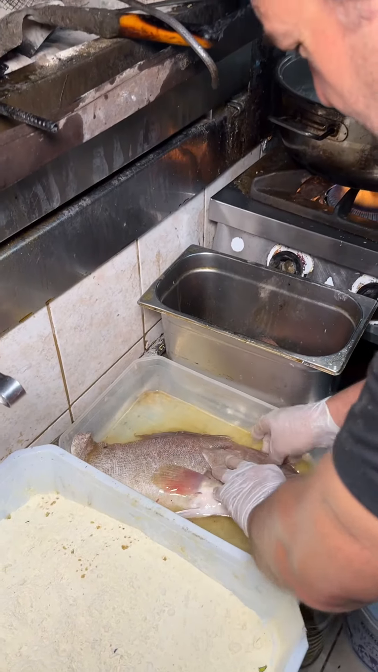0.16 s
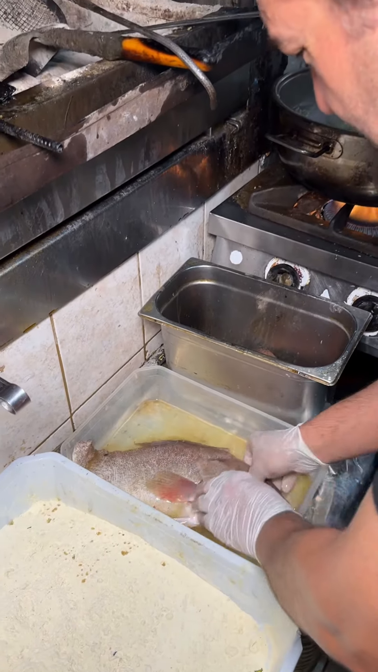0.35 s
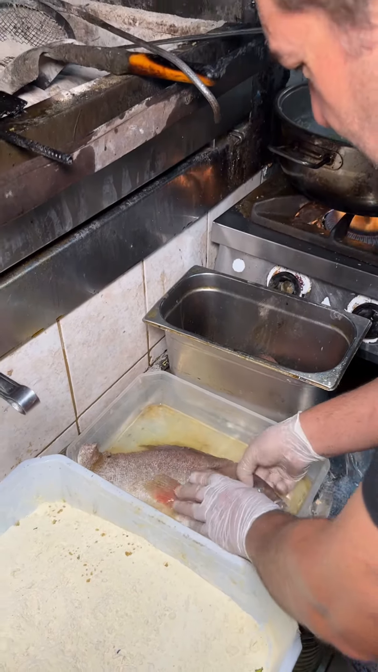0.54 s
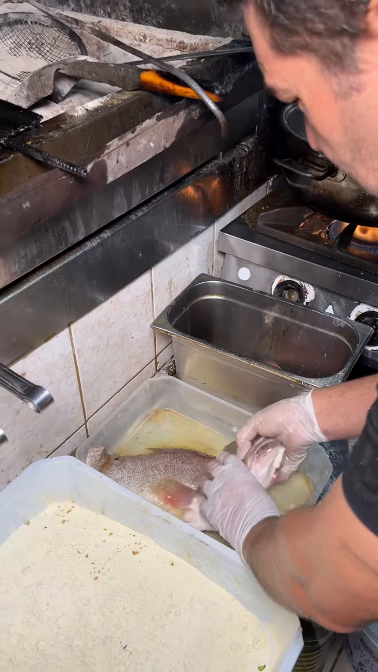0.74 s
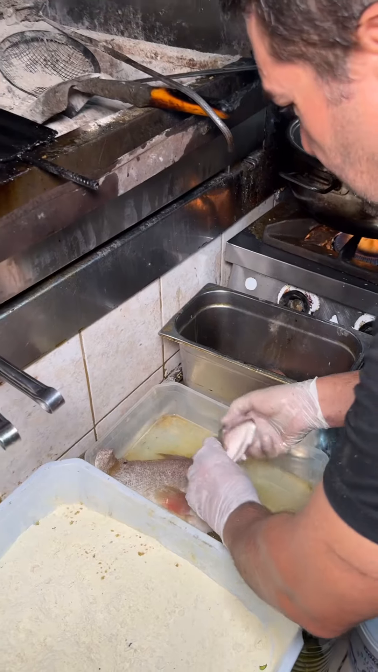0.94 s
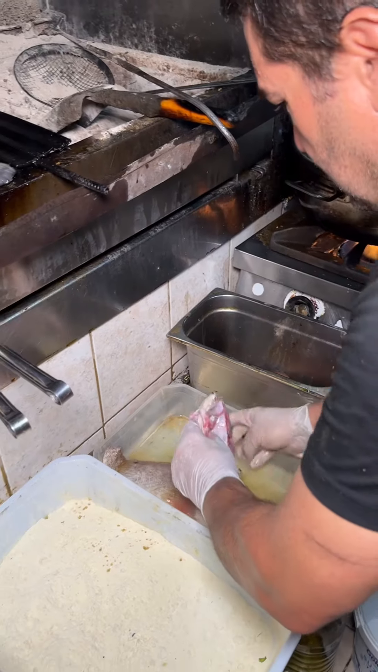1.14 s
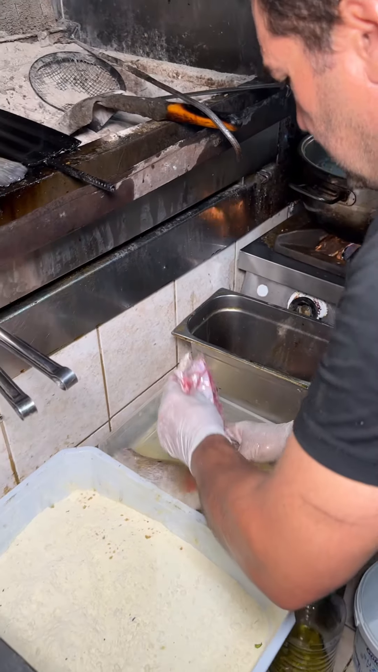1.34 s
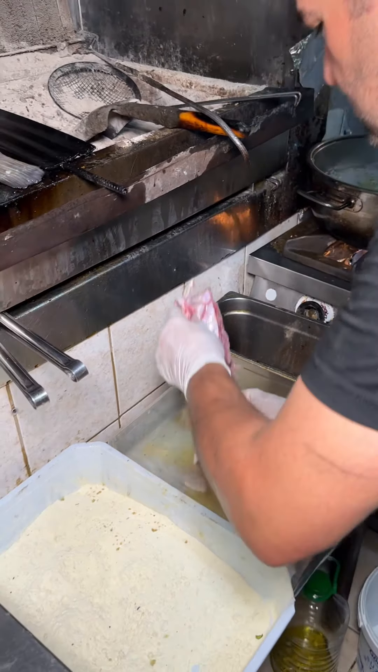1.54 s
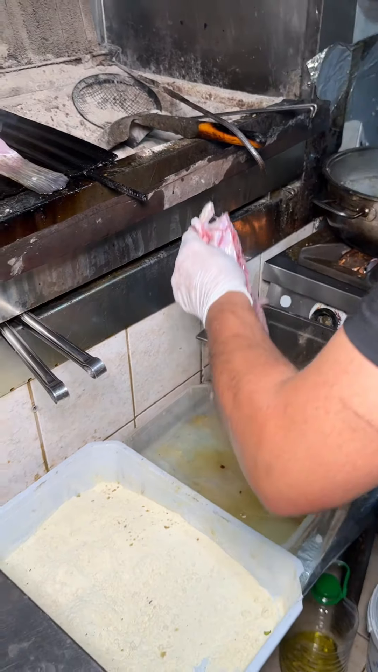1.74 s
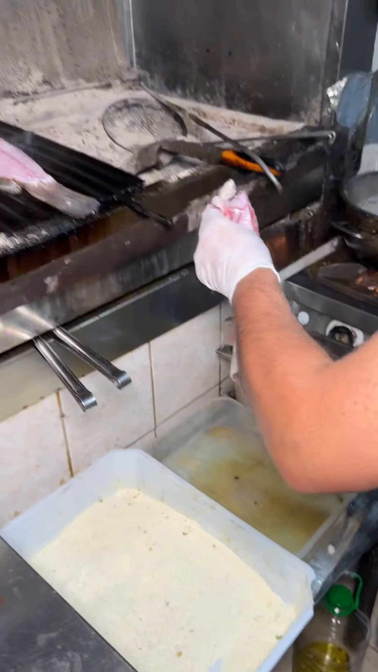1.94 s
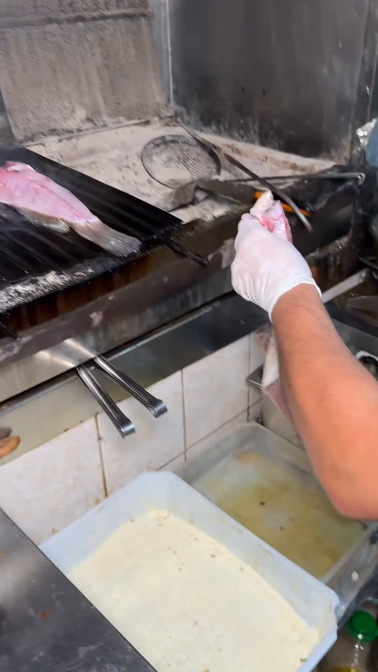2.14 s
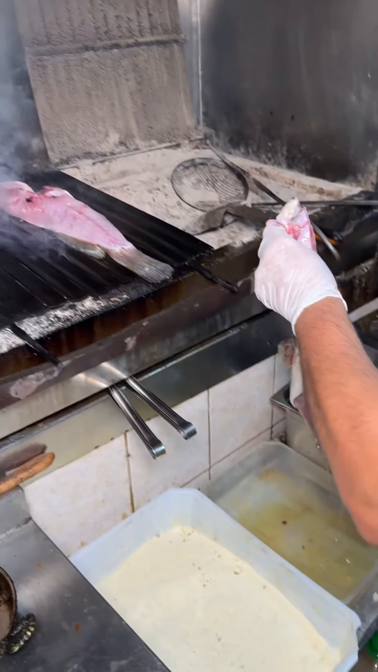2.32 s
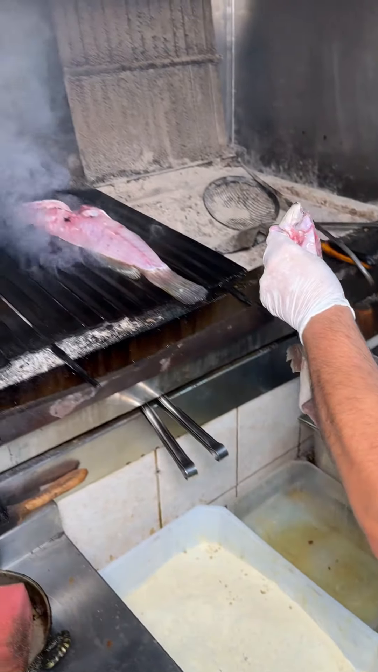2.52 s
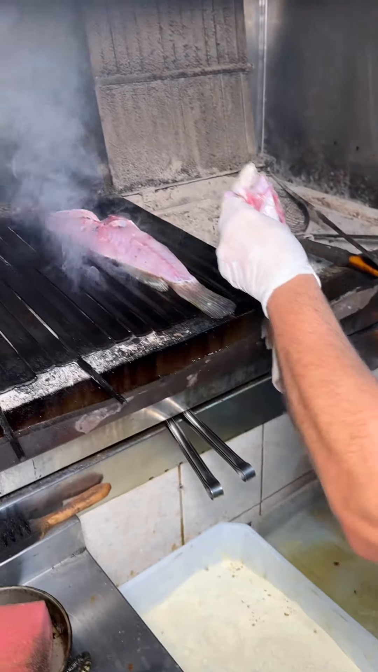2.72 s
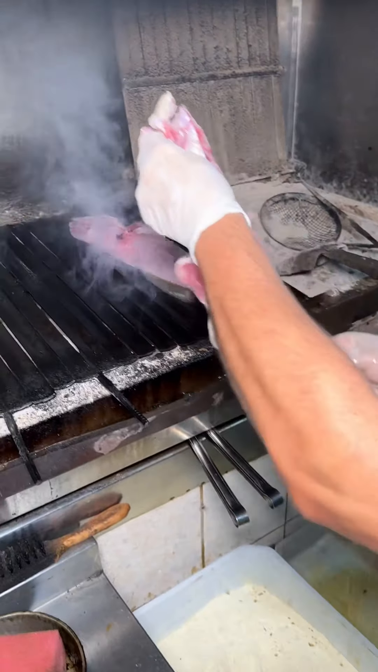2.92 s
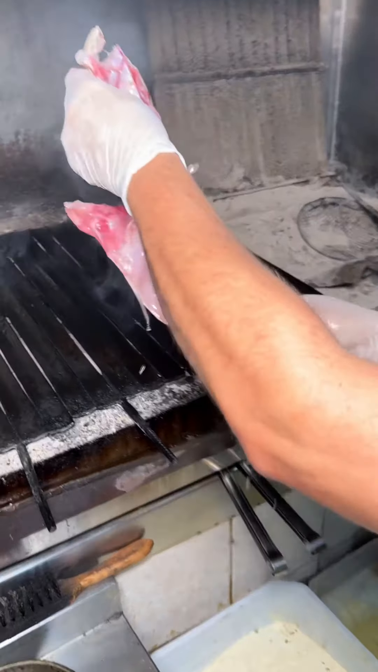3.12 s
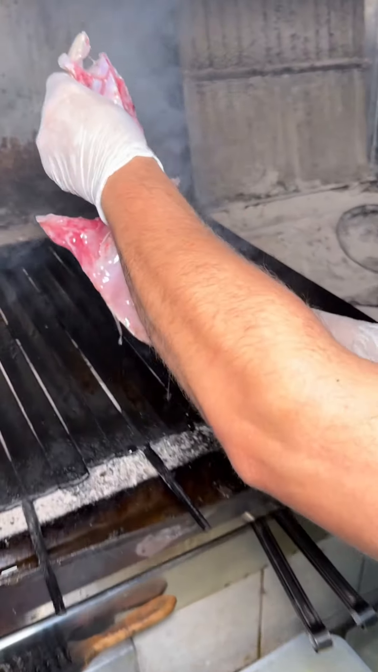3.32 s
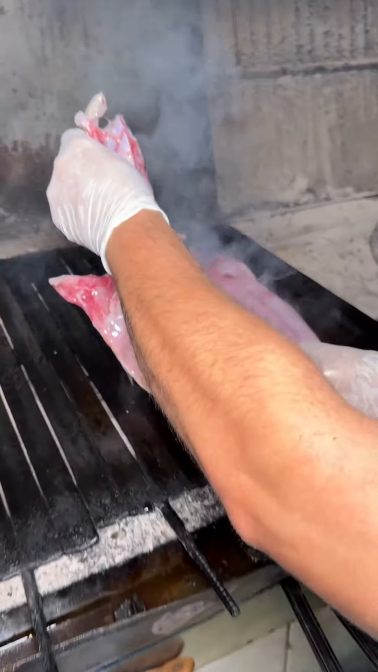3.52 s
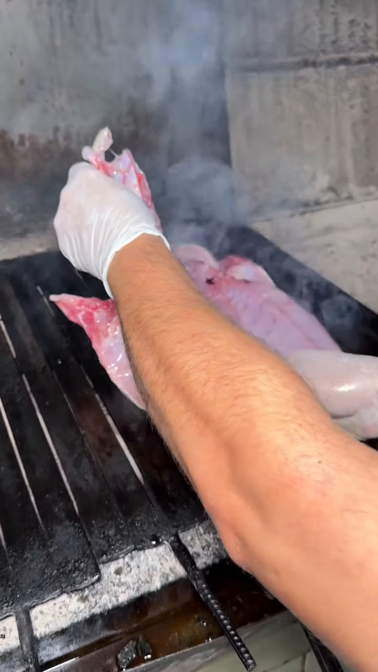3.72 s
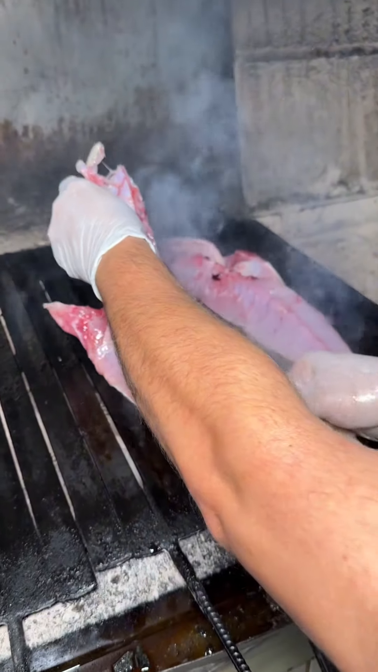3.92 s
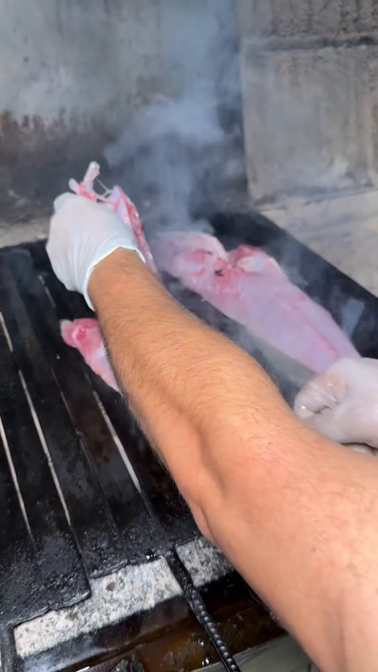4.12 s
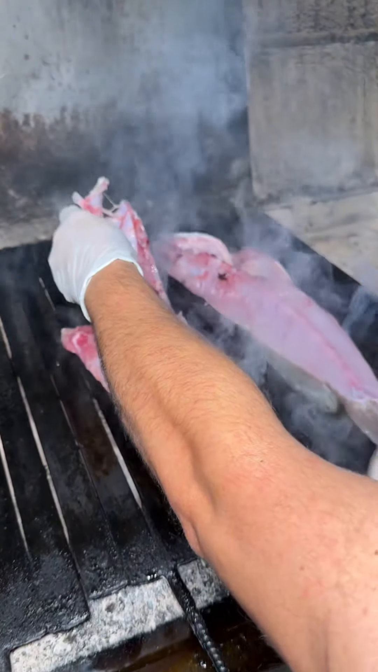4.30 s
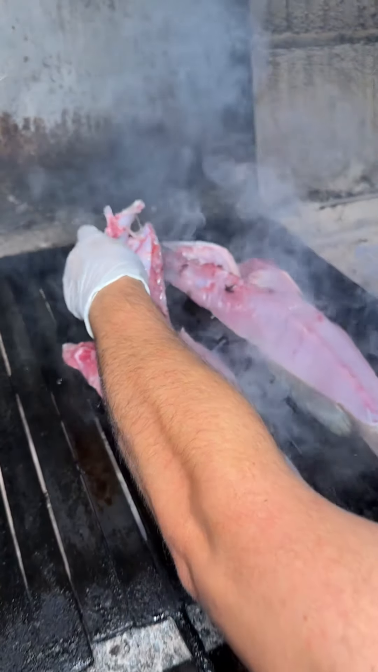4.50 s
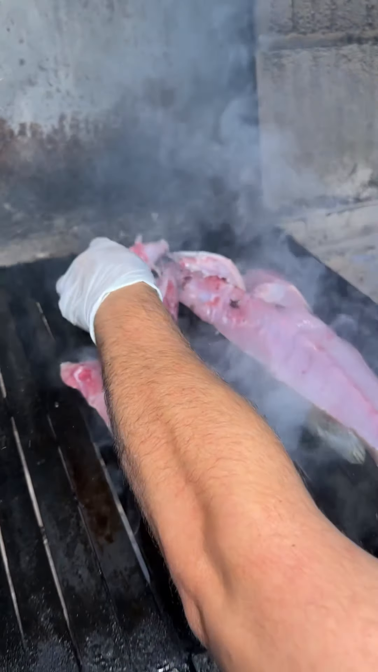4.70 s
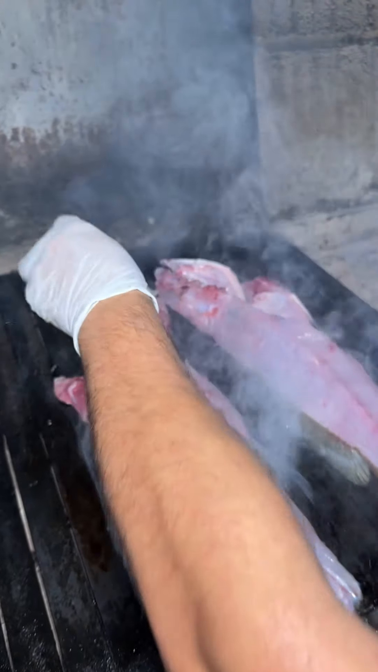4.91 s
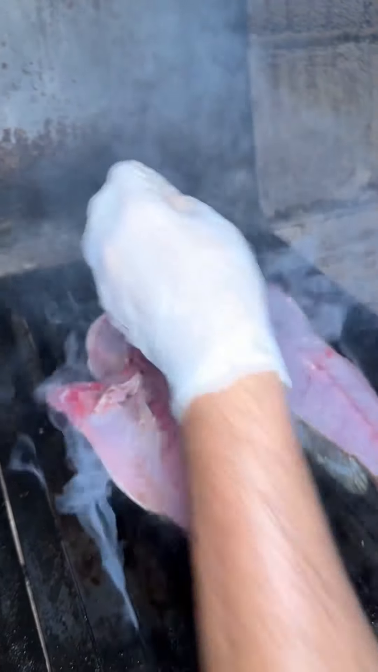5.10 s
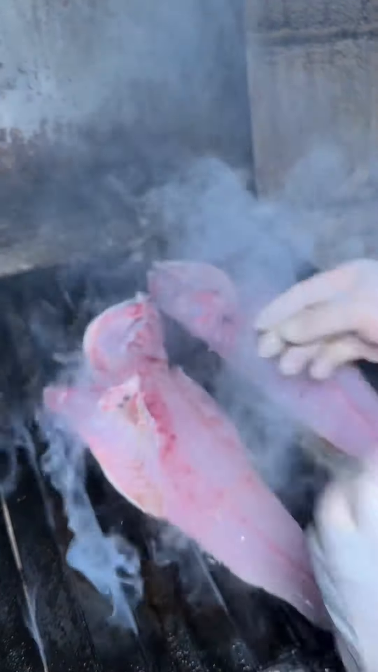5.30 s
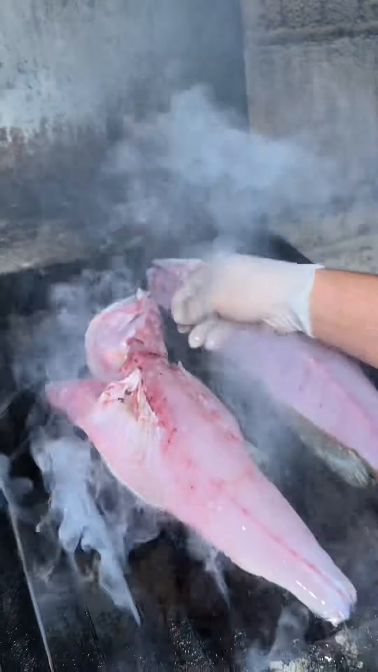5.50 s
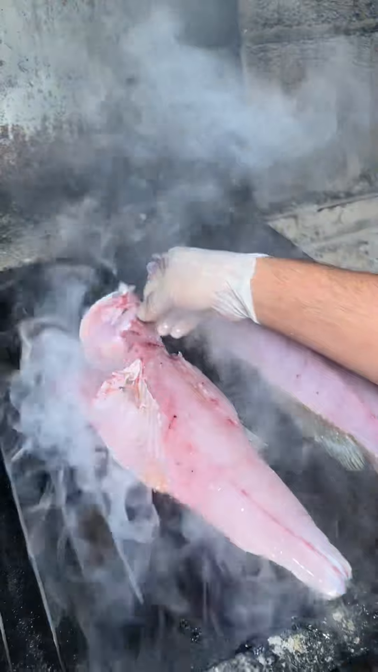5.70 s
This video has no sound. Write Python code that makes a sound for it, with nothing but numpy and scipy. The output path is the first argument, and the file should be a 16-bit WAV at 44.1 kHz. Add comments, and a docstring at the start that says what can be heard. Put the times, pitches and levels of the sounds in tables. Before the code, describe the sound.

Handheld close stereo pickup beside a hot grill. Thin distant crackling and droplet spits sit over a wavering low motor hum and drawn air. Soft boxy bumps are followed by a bright metallic clack. Then wet fish touches the bars and a dense, bright sizzle rises within about half a second, covering most of the background, with soft smacks, sharp pops and a brief steam squeak at the end.

```python
"""Kitchen with a charcoal grill: extractor and coolers hum (wavering sines) in a draught (shaped noise).
A first fish sizzles a little way off: random bursts, coloured and fluttering. Spits, flares and squeaks
are snaps, spray and narrow noise; dull thuds and clacks are rough tones, ringing modes and noise.
From 3.3 s a second, wet fish is laid on the bars close by: slaps, a swelling hiss and boiling juice.
Two closely spaced microphone ports pick it up."""
import sys
import numpy as np
from scipy import signal
from scipy.fft import rfft, irfft
from scipy.io import wavfile
from scipy.ndimage import uniform_filter1d

SR = 44100
rng = np.random.default_rng(int(sys.argv[2]) if len(sys.argv) > 2 else 0)


def pcm_store(signal):
    """Save signal as 16-bit PCM."""
    levels = np.round(np.clip(np.atleast_2d(signal), -1, 1) * 32767)
    wavfile.write(sys.argv[1], SR, levels.astype(np.int16).T)


N = 253575
TIME, HZ = np.arange(N) / SR, np.fft.rfftfreq(N, 1 / SR)

# sizzle spectrum from afar: freq_hz, density_db
FAR_FRY = [(300, -40), (1000, -20), (1700, -12), (2400, -6), (3100, -8), (4500, -4), (6200, 0),
           (7500, -1.2), (9500, -3), (11500, -1), (15000, 0)]
FIRST_FISH_DB = -34  # rms

# motor tones, the first one also scaled by the approach: freq_hz, level_db_rms, waver_rad_rms
HUM = [(46.7, -38, 0.12), (100.4, -39.5, 0.54), (137.8, -53.5, 1.4), (224.4, -45.5, 2.08), (238, -48, 1.73),
       (388.6, -54.5, 0.6)]
# drawn-air spectrum: freq_hz, density_db
DRAUGHT = [(20, -20), (45, -13), (70, 1.5), (120, -4.5), (190, 0.5), (250, -5), (310, -8), (420, -9.5),
           (750, -12), (1100, -19), (2000, -22), (5000, -19)]
DRAUGHT_DB, HUM_WAVER_HZ = -38.5, 8.1
# the deepest tone grows as the microphone moves in under the hood
APPROACH_S, APPROACH_LENGTH_S, AWAY_DB, UNDER_HOOD_DB = 2, 2.9, -1.5, 3.5

# dull thuds: start_s, boom_db, pitch_hz, rustle_db, rebound_db
THUDS = [(-0.045, -34, 166, -38, -46), (0.409, -22.5, 179.6, -28, -33), (0.749, -24, 177.3, -31.5, -43),
         (1.137, -25.5, 173, -36, -29.5), (1.580, -31.5, 174, -41.5, -48), (1.996, -31, 184.2, -43, -46),
         (2.24, -36.5, 202, -49, -40), (3.418, -40, 169.6, -41.5, -57), (4.5, -39, 206, -47, -43),
         (4.71, -33, 149, -48, -44)]
# thud rustle spectrum: freq_hz, density_db
THUD_RUSTLE = [(70, -12), (130, 2.5), (200, 3), (300, -12), (400, -6), (560, -7), (700, -16.5),
               (1000, -19.5), (1600, -30.5), (4000, -28.5)]
# hollow body ringing on after the push: freq_hz, level_db (against the boom), t60_s
HOLLOW = [(137.3, -8, 0.68), (168, -10, 0.51), (204, -16, 0.38)]
THUD_RISE_S, THUD_HOLD_S, THUD_T60_S = 0.014, 0.075, 0.14  # hold counts from the start
# pitch falls from +sag to -sag (share of pitch); roughness 0-1
THUD_SAG, THUD_ROUGH, JUDDER_HZ = .05, .27, 45
REBOUND_S, REBOUND_PITCH_RATIO = .125, .85

# juice running onto a bar: start_s, length_s, level_db
FLARES = [(0, .06, -31), (0.625, 0.089, -31), (1.61, .035, -30), (1.87, 0.085, -31), (1.962, 0.033, -31),
          (2.39, 0.068, -28), (3.11, 0.073, -35), (3.833, 0.045, -25), (3.915, 0.044, -22),
          (4.584, 0.11, -20)]
# droplet spray spectrum: freq_hz, density_db
SPRAY = [(500, -30), (1700, -15), (3000, -9), (4500, -3), (6300, 3), (8000, -1), (10000, -3), (15000, -1)]
# large bursting pockets of juice, levels before colouring: start_s, snap_db, spray_db, snap_hz
SPITS = [(0.2827, -2, -34, 10000), (0.3267, -6, -33, 5500), (0.3418, -11, -32, 6500),
         (0.3484, -1, -31, 7000), (0.3577, -9, -38, 7000), (0.5299, -9, -30, 9500), (0.5349, -9, -28, 5500),
         (0.7901, -14, -27, 6400), (0.8889, -16, -31.5, 6500), (0.9485, -8, -44, 9000),
         (1.1742, -15, -33, 6600), (1.2221, -3, -26, 7550), (1.2303, -9, -31, 7000),
         (1.2584, -8, -31, 5700), (1.411, -7, -34, 4970), (1.466, -18, -30, 6200), (1.661, -12, -34, 6000),
         (1.733, -20, -31, 5500), (1.8786, -14, -32, 7600), (2.359, -13, -36, 5000),
         (2.3824, -3, -32, 8000), (2.5088, -7, -26, 5700), (2.5451, -10, -39, 6600),
         (2.572, -12, -44, 7000), (2.973, -6, -36, 6500), (3.0253, -7, -28, 5500), (3.0832, -9, -33, 5700),
         (3.1203, -8, -32, 12000), (3.1416, -3, -25, 7000), (3.1647, -9, -35, 11000),
         (3.3472, -12, -37, 5600), (3.4832, -6, -31, 6000), (3.527, -6, -30, 9000), (4.1444, -1, -30, 7000),
         (4.4441, 1, -31, 8000), (4.5042, -2, -23, 5500), (4.5146, 1, -25, 4800), (5.0087, 0, -30, 7000),
         (5.2145, 1, -30, 6500), (5.3023, -1, -30, 7000)]
SNAP_DECAY_CYCLES = 0.17  # time constant
SPRAY_RISE_S, SPRAY_T60_S = 0.00054, 0.089
# small pockets: each up to SMALL_SPREAD_DB weaker, pitched in the octave above SMALL_HZ
SMALL_SPITS_PER_S, SMALL_SNAP_DB, SMALL_SPRAY_DB = 12, -16, -30.5
SMALL_SPREAD_DB, SMALL_HZ = 11, 4500

# steam squeaking out from under the skin: start_s, level_db, pitch_hz
SQUEAKS = [(1.412, -34.5, 5730), (2.945, -32, 6700), (2.972, -28, 6500), (3.446, -26.5, 6600),
           (5.582, -21.5, 2900)]
SQUEAK_HALF_WIDTH_HZ, SQUEAK_RISE_S, SQUEAK_T60_S = 620, 0.001, 0.11

# utensils knocked against the range: start_s, body_db, scrape_db, ring_db
CLACKS = [(1.636, -48, -37, -43), (2.73, -55, -39, -58), (2.8595, -44, -45, -27), (2.864, -38, -41, -39),
          (2.872, -33.5, -47, -24.5), (2.8756, -47, -49, -31)]
# utensil modes: freq_hz, level_db, t60_s
UTENSIL = [(4032, -1.5, .07), (4290, 1, 0.032), (4610, 2.5, 0.044), (4730, -5, .04), (5500, -10, .06),
           (6000, -2, .06), (6315, -10, .12), (6400, -7, 0.065)]
# range body modes: freq_hz, level_db, t60_s
RANGE_BODY = [(263, 5.5, 0.2), (572, 3.5, 0.073), (834, 1.5, 0.07), (968, 1, 0.064), (1250, -11, 0.046),
              (1396, -9, .04), (1950, -6.5, 0.1), (2875, -5, 0.06)]
# scrape spectrum: freq_hz, density_db
SCRAPE = [(100, -18), (450, -3), (1000, 2), (1700, 0), (3000, -1.5), (6000, -32), (12000, -25)]

# sizzle spectrum from close by: freq_hz, density_db
NEAR_FRY = [(300, -40), (1200, -20), (1800, -11), (2350, -4), (2750, -4.5), (3300, -8), (4200, -3.6),
            (5100, -5), (6200, -1.7), (7500, -2.3), (9500, -4), (11000, -1), (15000, 0)]
# boiling juice spectrum: freq_hz, density_db
BOIL = [(120, -13), (350, 0), (750, 2), (1200, -1), (1800, -2), (3000, -6), (8000, -42)]
# laid head to tail: hiss grows with contact, reaches SECOND_FISH_DB, then creeps up as it heats
TOUCH_S, LAY_S, LAY_CURVE = 3.31, 0.56, 1.16
SECOND_FISH_DB, HEATING_DB_PER_S = -17.5, 1.5
# juice boils harder up to a peak, then slowly dries off
BOIL_PEAK_S, BOIL_PEAK_DB, WETTING_DB_PER_S, DRYING_DB_PER_S = 4.455, -35.5, 11.5, 3.5
FAT_GAIN_DB, FAT_CLUMP_DB = -12, 3
# frying below COARSE_HZ follows the treble fizz
COARSE_HZ, COARSE_LAG_S = 5000, 0.073

# wet fish slapped and pressed on the bars: start_s, rise_s, t60_s, push_db, smack_db
TOUCHES = [(3.7135, .003, .035, -36, -23), (3.723, .002, .06, -35, -31), (4.74, 0.038, 0.7, -40, -31),
           (4.775, .005, .07, -32, -26), (5.565, 0.043, 0.15, -36, -34)]
# soft push spectrum: freq_hz, density_db
PUSH = [(100, -9), (300, 0), (520, 5), (900, -7), (1500, -30), (4000, -35)]
# wet smack spectrum: freq_hz, density_db
SMACK = [(200, -30), (600, -7), (880, 2), (1300, -3), (2000, -3.5), (2800, 1), (3600, -8), (8000, -7)]

# likeness of the two ports: freq_hz, likeness_0_to_1
LIKENESS = [(200, .995), (400, .9), (850, .65), (1700, .98), (2300, .94), (3100, .3), (4000, .72),
            (4900, .35), (5450, .97), (7400, .97), (8900, .45), (9900, .88), (10500, .998), (13300, .998),
            (14100, .75), (15500, .6)]
# lead of the left port: freq_hz, lead_rad
PORT_LEAD = [(2500, 0), (4000, .3), (5500, 0), (7700, -.12), (8700, -1.1), (9800, -2.9), (10500, -3.14),
             (13400, -3.14), (15700, -4.9)]
DIP_S, DIP_LENGTH_S, DIP_DB = 4.707, 0.0105, -9
EDGE_HZ = 15800


def amp(db):
    """Decibels to gain."""
    return 10 ** (np.asarray(db) / 20)


def evened(x):
    """Scales to rms 1."""
    return x / np.sqrt(np.mean(x ** 2) + 1e-20)


def ramp(start_s, length_s):
    """Goes evenly from 0 to 1 and stays there."""
    return np.clip((TIME - start_s) / length_s, 0, 1)


def read(points, hz):
    """Interpolates a spectrum on a log-frequency axis."""
    f, value = np.transpose(points)
    return np.interp(np.log(hz + 1), np.log(f + 1), value)


def colour(x, spectrum):
    """Filters by a spectrum, keeping the power of white noise."""
    return irfft(rfft(x) * evened(amp(read(spectrum, HZ))), N)


def drift(hz):
    """Low-passed noise of rms 1: slow random wander up to about the given rate."""
    return evened(irfft(rfft(rng.standard_normal(N)) / (1 + (HZ / hz) ** 4), N))


def add(mix, s, sound):
    """Mixes a two-row sound in at time s, cropped to the mix."""
    start = round(s * SR)
    sound = sound[:, max(-start, 0):]
    part = mix[:, max(start, 0):][:, :sound.shape[1]]
    part += sound[:, :part.shape[1]]


def kitchen(x, wet_db, t60):
    """Steel and tile return a short dense tail: decaying noise of unit energy."""
    t = np.arange(SR // 2) / SR
    tail = rng.standard_normal((2, len(t))) * amp(-60 * t / t60) * (t > .002)
    tail /= np.linalg.norm(tail[0])
    return x + amp(wet_db) * signal.fftconvolve(x, tail, axes=1)[:, :N]


def bubbles(per_s, spread_db, largest_db):
    """One-sample bursts at random moments, of random sign, dB sizes spread exponentially and capped."""
    size = amp(np.minimum(spread_db * rng.exponential(1, (2, N)), largest_db))
    sign = rng.choice([-1, 1], (2, N))
    return evened(size * sign * (rng.random((2, N)) < per_s / SR))


def flutter(x, patchy_db):
    """Steam vents open and shut: smooth random gain over time and pitch range."""
    z = signal.stft(x, nperseg=512)[2]
    patches = uniform_filter1d(rng.standard_normal(z.shape[1:]), size=14, axis=0)
    patches = evened(uniform_filter1d(patches, size=7, axis=1))
    return signal.istft(z * amp(patchy_db * patches), nperseg=512)[1][:, :N]


def ring(modes, t):
    """Struck body: a sum of decaying sines with random phases in each row."""
    sound = sum(amp(db - 60 * t / t60) * np.sin(2 * np.pi * (hz * t + rng.random((2, 1))))
                for hz, db, t60 in modes)
    return sound * np.minimum(t / 0.00067, 1)


def first_fish():
    """Juice bursts crackle in little flurries with the room on them; equal sharp ticks stay dry."""
    crackle = bubbles(per_s=6000, spread_db=3.5, largest_db=20) * amp(1.5 * drift(hz=30))
    fry = flutter(kitchen(crackle, wet_db=-6, t60=0.15), patchy_db=2.4)
    ticks = bubbles(per_s=58, spread_db=7, largest_db=-8) * [[1], [0]]  # cap makes all sizes equal
    return amp(FIRST_FISH_DB) * evened(colour(fry + amp(-11.5) * ticks, FAR_FRY))


def extractor():
    """Motors give phase-wavering sines in the noise of drawn air; the deepest grows under the hood."""
    out = amp(DRAUGHT_DB) * colour(rng.standard_normal((2, N)), DRAUGHT)
    tones = [amp(db) * np.sqrt(2) * np.sin(2 * np.pi * hz * TIME + waver * drift(HUM_WAVER_HZ))
             for hz, db, waver in HUM]
    near_db = AWAY_DB + (UNDER_HOOD_DB - AWAY_DB) * ramp(APPROACH_S, APPROACH_LENGTH_S)
    out[0] += tones[0] * amp(near_db) + sum(tones[1:])
    return out


def thuds():
    """Dragging bumps on a hollow body: sagging rough boom, modes and rustle, then a weaker, lower rumble."""
    boom, rustle, t = np.zeros((2, N)), np.zeros((2, N)), np.arange(SR // 2) / SR
    push = np.minimum(t / THUD_RISE_S, 1) * amp(-60 * np.maximum(t - THUD_HOLD_S, 0) / THUD_T60_S)
    onset = np.minimum(t / THUD_HOLD_S, 1)
    phase_per_hz = 2 * np.pi * np.cumsum(1 + THUD_SAG * (1 - 2 * onset)) / SR
    judder = (drift(hz=JUDDER_HZ) + 1j * drift(hz=JUDDER_HZ)) / np.sqrt(2)
    for s, db, hz, rustle_db, rebound_db in THUDS:
        drag = np.roll(judder, -round(s * SR))[:len(t)]
        bump = (np.sqrt(1 - THUD_ROUGH ** 2) + THUD_ROUGH * drag) * np.exp(1j * hz * phase_per_hz)
        rumble = drag[::-1] * np.exp(2j * np.pi * hz * REBOUND_PITCH_RATIO * t)
        add(boom, s, amp(db) * push * bump.imag * [[1], [0]])
        add(boom, s, amp(db) * ring(HOLLOW, t) * onset * [[1], [0]])
        add(boom, s + REBOUND_S, amp(rebound_db) * push * rumble.imag * [[1], [0]])
        add(rustle, s, amp(rustle_db) * np.array([push, push]))
    noise = colour(rng.standard_normal((2, N)), THUD_RUSTLE)
    return kitchen(boom, wet_db=-27, t60=0.19) + kitchen(rustle * noise, wet_db=-5, t60=0.75)


def flares():
    """Juice running onto a bar boils off: a half-sine swell of fizz without a snap."""
    swell = sum(amp(db) * np.sin(np.pi * ramp(s, length)) for s, length, db in FLARES)
    fizz = flutter(bubbles(per_s=5800, spread_db=-0.5, largest_db=12), patchy_db=-2.0)
    return swell * colour(fizz, SPRAY)


def spits():
    """A juice pocket snaps open (heavily damped cosine) and its droplets fizz away on the bars."""
    out, t = np.zeros((2, N)), np.arange(SR // 5) / SR
    droplets = flutter(bubbles(per_s=12000, spread_db=2.0, largest_db=12), patchy_db=2.0)
    fade = np.minimum(t / SPRAY_RISE_S, 1) * amp(-60 * t / SPRAY_T60_S)
    small = []
    for k, (when, weak, high) in enumerate(rng.random(size=(90, 3))):  # one per time slot
        weaker_db = SMALL_SPREAD_DB * weak
        small.append(((k + when) / SMALL_SPITS_PER_S, SMALL_SNAP_DB - weaker_db,
                      SMALL_SPRAY_DB - weaker_db, SMALL_HZ * 2 ** high))
    for s, snap_db, spray_db, hz in list(SPITS) + small:
        snap = np.exp(-hz * t / SNAP_DECAY_CYCLES) * np.cos(2 * np.pi * hz * t) * [[1], [0]]
        spray = np.roll(droplets, -round(s * SR), axis=1)[:, :len(t)]
        add(out, s, amp(snap_db) * snap + amp(spray_db) * fade * spray)
    return kitchen(colour(out, SPRAY), wet_db=-7, t60=0.2)


def squeaks():
    """A thin jet of steam gives a short, fuzzy whistle: decaying band-passed noise."""
    out, t = np.zeros((2, N)), np.arange(SR // 6) / SR
    fade = np.minimum(t / SQUEAK_RISE_S, 1) * amp(-60 * t / SQUEAK_T60_S)
    for s, db, hz in SQUEAKS:
        edges_hz = [hz - SQUEAK_HALF_WIDTH_HZ, hz + SQUEAK_HALF_WIDTH_HZ]
        band = signal.butter(2, edges_hz, "bandpass", fs=SR, output="sos")
        whistle = evened(signal.sosfilt(band, rng.standard_normal((2, len(t)))))
        add(out, s, amp(db) * fade * whistle)
    return out


def clacks():
    """A utensil's modes clink with a noise tick and scrape; the steel range answers with duller modes."""
    out, t = np.zeros((2, N)), np.arange(SR // 3) / SR
    rasp = colour(rng.standard_normal((2, N)), SCRAPE)
    for s, body_db, scrape_db, ring_db in CLACKS:
        scrape = np.roll(rasp, -round(s * SR), axis=1)[:, :len(t)] * amp(-60 * t / 0.11)
        tick = rng.standard_normal((2, len(t))) * amp(-60 * t / 0.016)
        add(out, s, amp(body_db) * ring(RANGE_BODY, t) + amp(scrape_db) * scrape)
        add(out, s, amp(ring_db) * (ring(UTENSIL, t) + amp(-1) * tick))
    return kitchen(out, wet_db=-5.0, t60=0.15)


def second_fish():
    """Wet skin meets hot bars: dense fizz and clumps of crackling fat over lower boiling noise."""
    contact = ramp(TOUCH_S, LAY_S) ** LAY_CURVE
    late_contact = ramp(TOUCH_S + COARSE_LAG_S, LAY_S) ** LAY_CURVE
    fry_db = SECOND_FISH_DB + HEATING_DB_PER_S * (TIME - TOUCH_S - LAY_S)
    after_peak_s = TIME - BOIL_PEAK_S
    boil_db = BOIL_PEAK_DB + np.minimum(WETTING_DB_PER_S * after_peak_s, -DRYING_DB_PER_S * after_peak_s)

    fizz = bubbles(per_s=22000, spread_db=2.4, largest_db=13) * amp(0.82 * drift(hz=26.1))
    fizz = flutter(kitchen(fizz, wet_db=-10.0, t60=0.13), patchy_db=1.86)
    clumps = amp(FAT_CLUMP_DB * np.minimum(drift(hz=9), 1))
    fat = evened(bubbles(per_s=260, spread_db=4, largest_db=6) * clumps)
    boil = kitchen(bubbles(per_s=2500, spread_db=2.5, largest_db=17.5), wet_db=-5.0, t60=0.2)
    boil = evened(colour(boil, BOIL))

    fry = evened(colour(fizz + amp(FAT_GAIN_DB) * fat, NEAR_FRY))
    coarse = irfft(rfft(fry) / (1 + (HZ / COARSE_HZ) ** 8), N)
    hiss = amp(fry_db) * (contact * (fry - coarse) + late_contact * coarse)
    return hiss + late_contact * amp(boil_db) * boil


def touches():
    """Soft flesh does not ring: a low noise push with a wet, grainy smack on top."""
    push = colour(rng.standard_normal((2, N)), PUSH)
    smack = colour(bubbles(per_s=3400, spread_db=2.0, largest_db=9), SMACK)
    out = np.zeros((2, N))
    for s, rise, t60, push_db, smack_db in TOUCHES:
        envelope = ramp(s, rise) * amp(-60 * np.maximum(TIME - s - rise, 0) / t60)
        out += envelope * (amp(push_db) * push + amp(smack_db) * smack)
    return out


def ports(x):
    """Row 0 reaches both ports alike, row 1 oppositely; in the treble the ports drift out of phase."""
    same = np.clip(read(LIKENESS, HZ), -1, 1)
    shared, opposed = rfft(x) * np.sqrt([(1 + same) / 2, (1 - same) / 2])
    left = shared + opposed
    right = (shared - opposed) * np.exp(-1j * read(PORT_LEAD, HZ))
    return irfft(np.array([left, right]), N)


def scene():
    """The grill and the kitchen around it, at the two ports."""
    grill = first_fish() + second_fish() + spits() + flares() + squeaks() + touches()
    return ports(grill + thuds() + clacks() + extractor())


def record(dry):
    """The level dips briefly once; a low-pass then limits the band."""
    dip = ramp(DIP_S, .002) - ramp(DIP_S + DIP_LENGTH_S, 0.0019)
    edge = signal.firwin(1023, EDGE_HZ, window=("kaiser", 9), fs=SR)
    return signal.oaconvolve(dry * amp(DIP_DB * dip), edge[None], "same", axes=1)


dry = scene()
out = record(dry)
pcm_store(out)
```